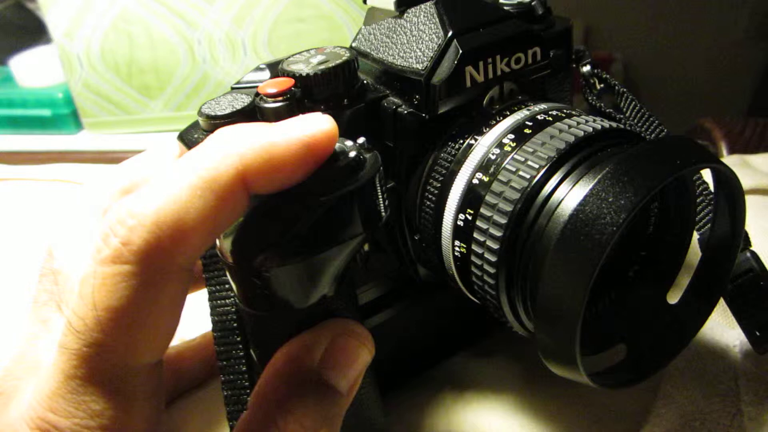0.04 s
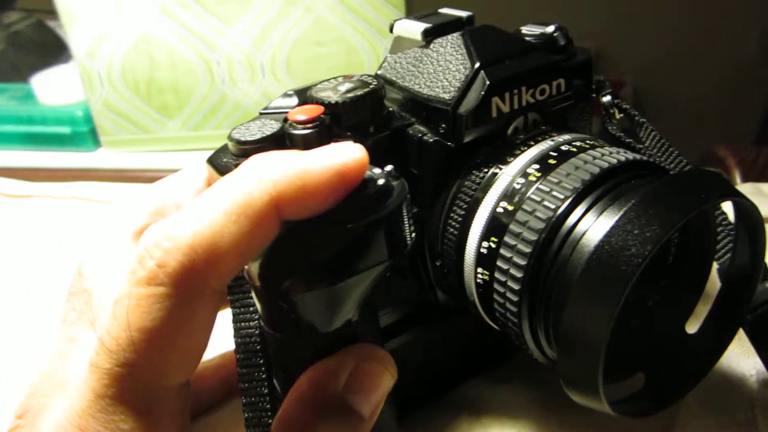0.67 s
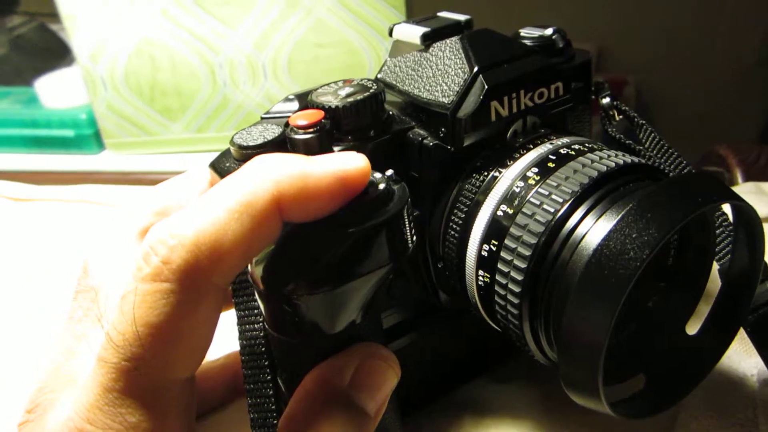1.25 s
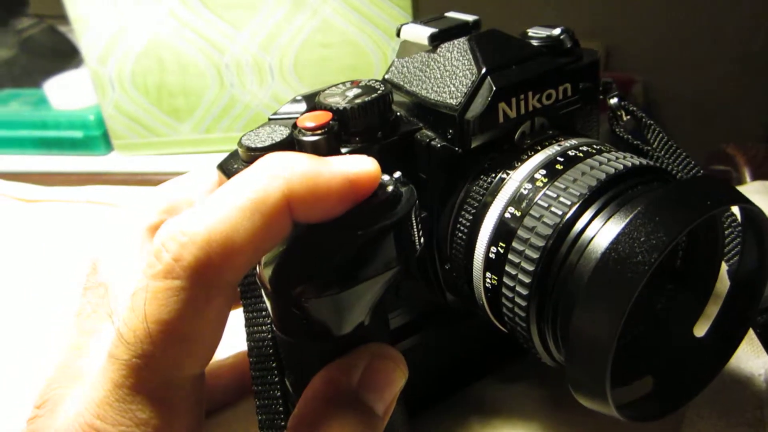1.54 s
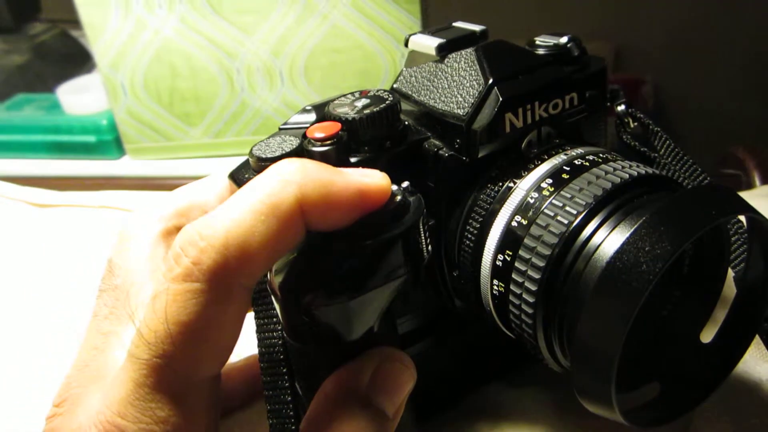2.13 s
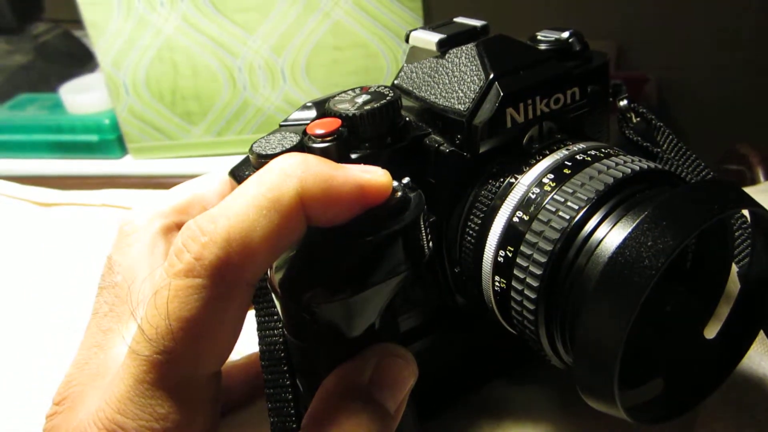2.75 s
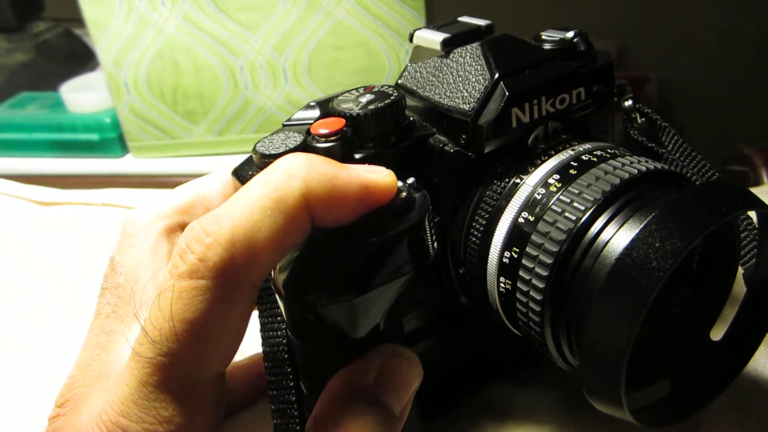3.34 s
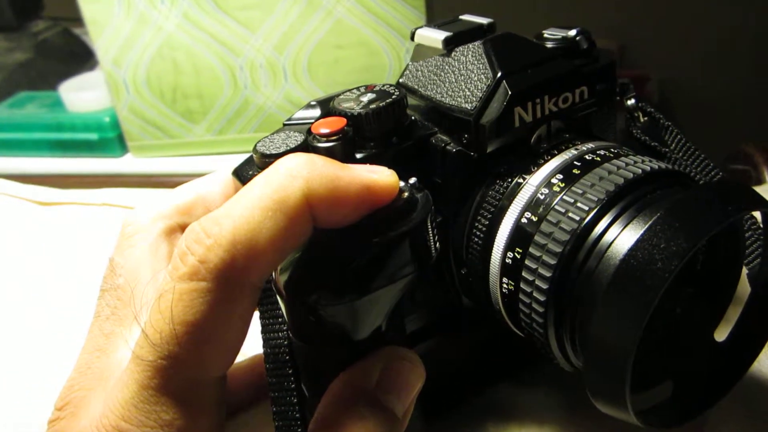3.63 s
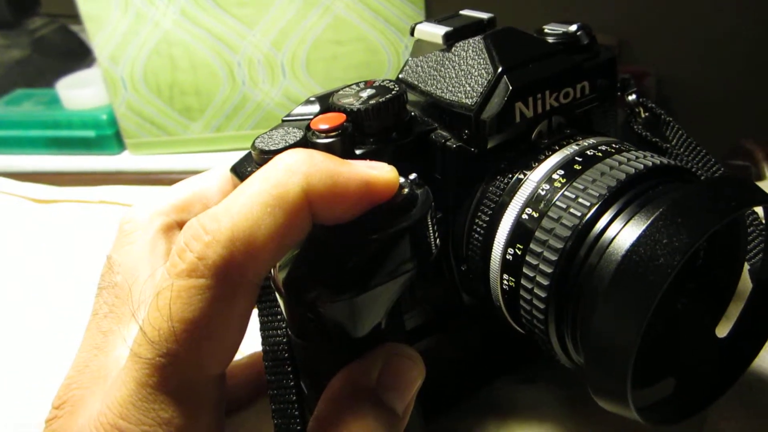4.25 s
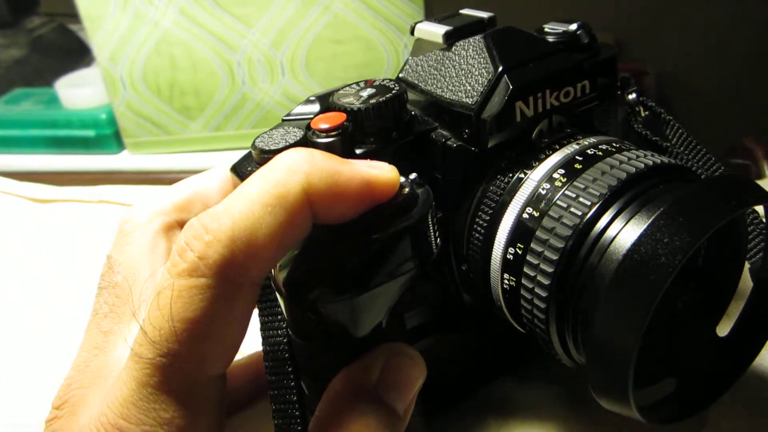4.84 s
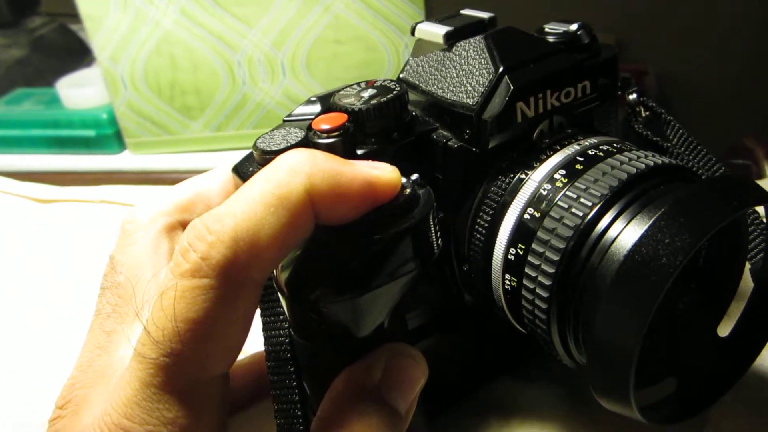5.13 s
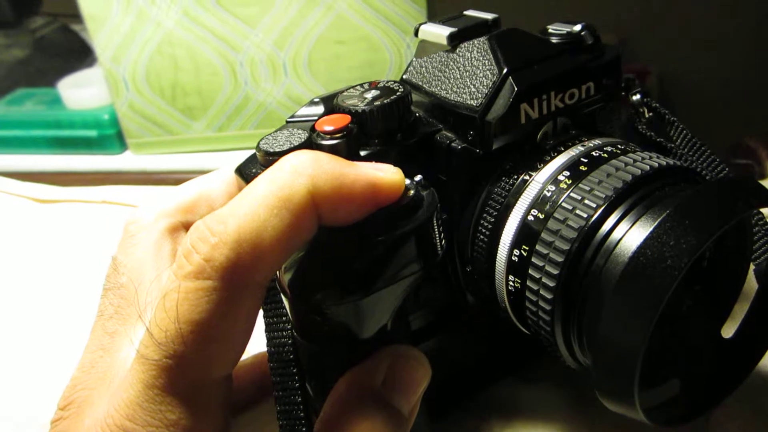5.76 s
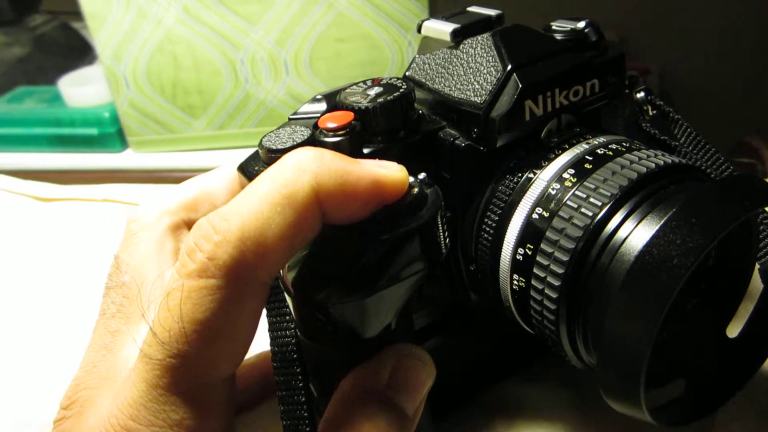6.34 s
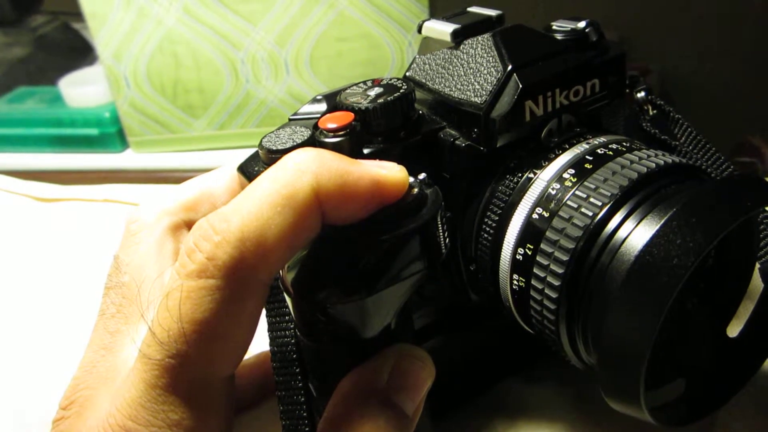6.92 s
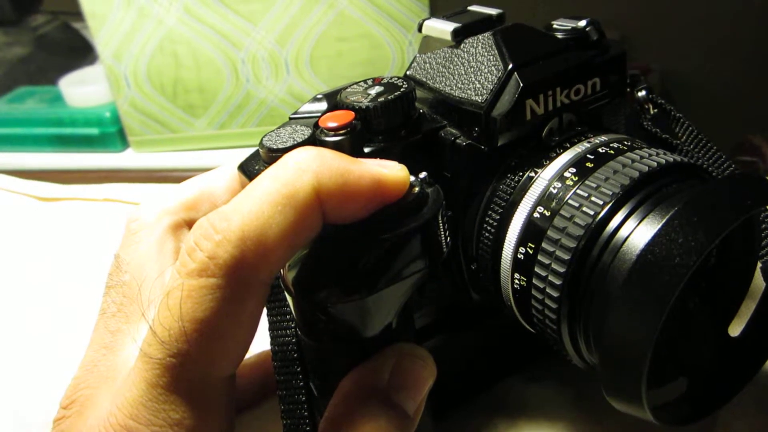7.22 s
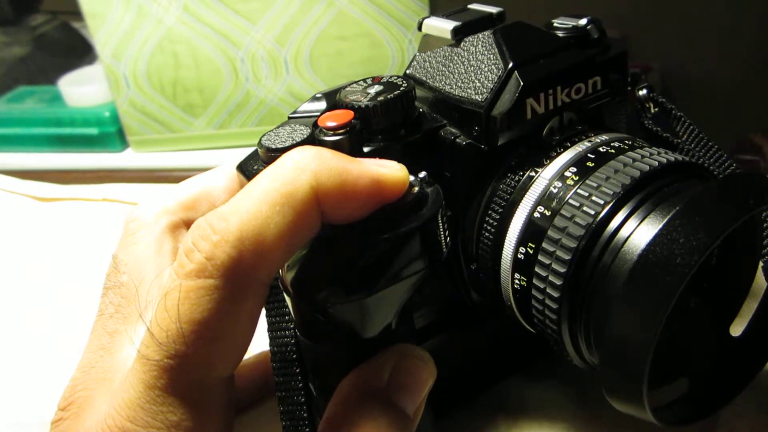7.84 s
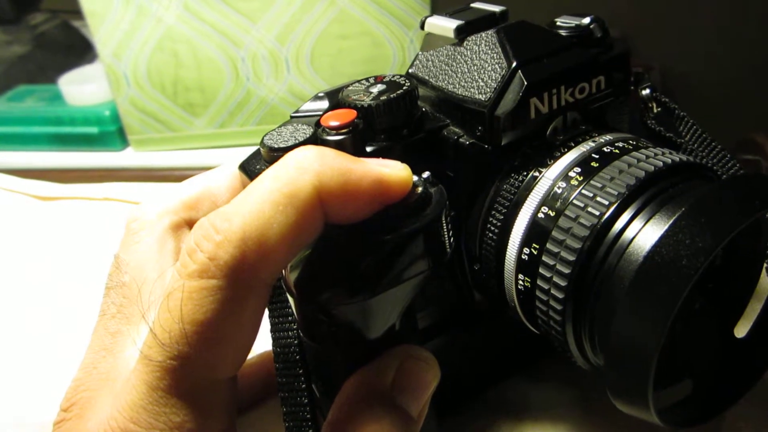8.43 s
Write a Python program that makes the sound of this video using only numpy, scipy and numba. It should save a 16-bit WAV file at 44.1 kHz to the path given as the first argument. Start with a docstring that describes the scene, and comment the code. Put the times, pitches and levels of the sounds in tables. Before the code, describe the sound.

A low, muffled engine rises in pitch outside a small, quiet room. Then a button clicks and a film camera with a motor drive fires a continuous burst of about two dozen shots, loud and very near the microphone. Crisp shutter snaps and hard, slightly ringing clacks alternate with brief whirs of winding gears in an even rhythm. The engine is barely audible beneath the camera, and there is little echo.

```python
"""A motor-driven film camera fires 23 frames in a burst, close by in a quiet room.
Between frames, gears wind against a ratchet and hit their stop; then the mirror flips up, the shutter
runs and the mirror drops. Each impact excites the resonances of its part, and the metal body rings.
An engine revs outside, heard through the wall and in the room's modes. Automatic gain control
ducks it as soon as the camera starts."""
import sys
import numpy as np
from scipy import signal
from scipy.fft import rfft, irfft
from scipy.io import wavfile
from scipy.ndimage import uniform_filter1d
from numba import njit

SR = 44100
rng = np.random.default_rng(int(sys.argv[2]) if len(sys.argv) > 2 else 0)


def file_out(sig):
    """Save sig as 16-bit WAV at sys.argv[1]."""
    # one column per channel
    cols = np.atleast_2d(sig).T
    # limit, then scale
    lim = np.clip(cols, -1, 1)
    pcm = np.round(lim * 32767).astype(np.int16)
    wavfile.write(sys.argv[1], SR, pcm)


N = 382788
T = np.arange(N) / SR


def undb(db):
    """Decibels to amplitude ratio."""
    return 10 ** (np.asarray(db) / 20)


def samples(ms):
    """Milliseconds to a whole number of samples."""
    return int(round(ms * SR / 1000))


def clock(start_ms, end_ms):
    """Time in ms of every sample between two moments."""
    return np.arange(samples(start_ms), samples(end_ms)) * 1000 / SR


def curve(points):
    """Linear interpolation of (seconds, value) points over the whole scene."""
    return np.interp(T, *np.transpose(points))


def shape(points, hz):
    """Magnitude response: gain of a (Hz, dB) spectrum, interpolated over log frequency."""
    corner_hz, db = np.transpose(points)
    return undb(np.interp(np.log(hz + 1), np.log(corner_hz), db))


def add(track, s, ms, sound):
    """Superposition: mix a sound into a track, ms after the moment s."""
    i = min(int(s * SR) + samples(ms), N)
    track[i:i + len(sound)] += sound[:N - i]


def through(x, response):
    """Convolution with an impulse response scaled to unit energy."""
    return signal.fftconvolve(x, response / np.linalg.norm(response))[:N]


def colour(x, points, size=2048):
    """Minimum-phase filter with the given relative spectrum, made by folding the cepstrum."""
    cepstrum = irfft(np.log(shape(points, np.fft.rfftfreq(size, 1 / SR))))
    cepstrum[1:size // 2] *= 2
    cepstrum[size // 2 + 1:] = 0
    return through(x, irfft(np.exp(rfft(cepstrum))))


def fade(t60):
    """Exponential decay down to -60 dB."""
    return np.exp(-np.log(1000) * T[:int(t60 * SR)] / t60)


def ring(x, modes):
    """Modal resonance: a sound drives a set of damped sinusoids."""
    response = np.zeros(SR // 2)
    for hz, db, t60 in modes:
        decay = fade(t60)[:len(response)]
        response[:len(decay)] += undb(db) * decay * np.cos(2 * np.pi * hz * T[:len(decay)])
    return through(x, response)


def gate(t, start_ms, attack_ms, end_ms, release_ms):
    """Envelope with a linear attack, a hold and an exponential release."""
    return np.clip((t - start_ms) / attack_ms, 0, 1) * np.exp(-np.maximum(t - end_ms, 0) / release_ms)


def walk(rate_hz):
    """Slow random modulation: smoothed steps with a spread of 1."""
    hold = int(SR / rate_hz)
    steps = np.repeat(rng.standard_normal(N // hold + 1), hold)
    smooth = uniform_filter1d(uniform_filter1d(steps, hold), hold)[:N]
    return smooth / smooth.std()


def unsteady(t, size=350):
    """Quick random modulation: a moving average of noise with a spread of 1."""
    drift = uniform_filter1d(rng.standard_normal(len(t)), size=size)
    return drift / drift.std()


def chatter(decay_ms, rise_ms=0.19, ragged_db=2.5):
    """Broadband excitation: a dying burst of tiny contacts of uneven strength."""
    t = clock(0, 30)
    envelope = np.sqrt(np.exp(-t / decay_ms) * (1 - np.exp(-t / rise_ms)))
    burst = envelope * undb(ragged_db * unsteady(t, size=20)) * rng.standard_normal(len(t))
    whitened = irfft(np.exp(1j * np.angle(rfft(burst))), len(t))
    return whitened * np.linalg.norm(envelope) * envelope


# Spectrum of the street and room noise. Each row: frequency in Hz, relative density in dB.
AMBIENT_SPECTRUM = [(130, -3.5), (290, -8), (1200, -15.5), (7700, -35.5), (15500, -44)]
# Course of that noise. Each row: time in seconds, level in dB.
AMBIENT_LEVEL = [(0, -54), (1.4, -48), (8.68, -60)]


def ambient_noise():
    """Street and room noise is broadband, with a density that falls toward the treble."""
    return undb(curve(AMBIENT_LEVEL)) * colour(rng.standard_normal(N), AMBIENT_SPECTRUM)


# Speed of the engine as it pulls through two gears. Each row: time in seconds, firing rate in Hz.
FIRING_RATE = [(0.08, 27.46), (1.12, 54.14), (2.19, 76.24), (2.88, 49.84), (3.12, 40.2), (3.81, 43.02),
               (7.33, 69.38), (8.33, 36.65)]
# Transmission through the wall. Each row: frequency in Hz, gain in dB.
WALL_TRANSMISSION = [(25, -21), (42, -2), (60, 1), (78, -5), (152, -24), (182, -10), (212, -32)]
# Course of the engine's hum. Each row: time in seconds, gain in dB.
HUM_GAIN = [(.15, -35.5), (.32, -43), (.47, -35), (.7, -42.5), (1.1, -37.5), (1.33, -28.5), (1.45, -37.5),
            (1.75, -42), (1.87, -31), (2.7, -41.5), (4.3, -42), (5.0, -46.5), (7.6, -45.5), (8.2, -66)]
# Emphasis of the hum's second harmonic. Each row: time in seconds, added gain in dB.
SECOND_HARMONIC_GAIN = [(2.6, -7), (3.2, 2.5), (6.45, 19.5), (6.8, -2)]
# Room modes driven by the exhaust. Each row: frequency in Hz, relative level in dB, T60 in seconds.
ROOM_RESONANCES = [(182, -4, 0.21), (366, -0.5, .22), (419, 1.5, .19)]


def engine(count=12, waver_db=2.0, jitter=0.00843, mid_hz=55,
           drone_db=-57, drone_db_per_octave=13, gas_db=1.5):
    """Forced resonance: firing harmonics hum through the wall and excite each room mode they pass."""
    hz = curve(FIRING_RATE)
    phase = 2 * np.pi * np.cumsum(hz * (1 + jitter * walk(14))) / SR
    harmonics = {k: undb(waver_db * walk(25.1)) * np.sin(k * phase + rng.uniform(0, 2 * np.pi))
                 for k in range(1, count + 1)}
    second_db = curve(SECOND_HARMONIC_GAIN)
    hum = sum(shape(WALL_TRANSMISSION, k * hz) * undb((k == 2) * second_db) * harmonics[k]
              for k in range(1, 6))
    firings = 2 * np.sqrt(hz / SR) * sum(harmonics.values())  # as strong per Hz as unit white noise
    puffs = (1 + np.cos(phase)) * rng.standard_normal(N)  # one puff of gas per firing
    drone = ring(firings + undb(gas_db) * puffs, ROOM_RESONANCES)
    drone_gain = undb(drone_db + drone_db_per_octave * np.log2(hz / mid_hz))
    return undb(curve(HUM_GAIN)) * hum + drone_gain * drone


# Response of each camera part, listed by name. Each row: frequency in Hz, relative level in dB.
PART_SPECTRA = {"stop": [(150, -28), (800, -24.5), (1300, -18), (1750, -25.5), (2020, -7.5), (2180, -2),
                (2370, -13.5), (2550, -5), (3200, 2), (4950, -0.5), (5400, -11), (6100, -13.5),
                (6750, -10.5), (7300, -19.5), (9700, -16.5), (15500, -31)], "mirror up": [(200, -31),
                (900, -16), (1700, -16.5), (2000, -6), (2700, -6), (3200, 0), (4100, -10.5), (5500, -0.5),
                (7000, -8), (8300, -0.5), (9150, -13.5), (9700, -3.5), (14700, -8.5), (15600, -26.5)],
                "first curtain": [(250, -26), (450, -10.5), (900, -20.5), (1250, -8.5), (1900, -25),
                (2950, -1), (4800, -11), (5600, -5.5), (8800, -5), (15500, -15)],
                "second curtain": [(250, -32), (550, -11.5), (1100, -8.5), (2000, -9.5), (2400, 5.5),
                (3000, 0.5), (4200, -3), (6500, -1.5), (10000, -4.5), (15500, -14.5)],
                "mirror down": [(250, -46), (700, -24), (1000, -12), (1300, -23), (2400, -9.5),
                (3400, -0.5), (4400, -5.5), (6500, 0.5), (12000, -7), (15500, -15.5)],
                "levers": [(250, -16.5), (2200, -3), (6000, -2.5), (9500, -3.5), (12000, -10),
                (15500, -16)], "gears": [(300, -24.5), (900, -8), (1500, -2), (1900, -8.5), (3300, 1),
                (5200, -2), (6700, -2.5), (7200, -4.5), (10700, -4), (12600, -13), (15500, -21)],
                "latch": [(600, -28), (1450, 4), (7000, 12.5), (13500, 2), (15500, -12)]}


def finger(settle_s=.104, settle_db=-44, press_s=2.1165, press_db=-16):
    """Light impacts: a finger settles on the grip, then clicks the release."""
    settle, press = np.zeros((2, N))
    add(settle, settle_s, 0, undb(settle_db) * chatter(decay_ms=2.9))
    add(press, press_s, 0, undb(press_db) * chatter(decay_ms=1.0))
    button_spectrum = [(800, -27), (2500, -7), (7000, -3), (15000, 2)]
    return colour(settle, PART_SPECTRA["stop"]) + colour(press, button_spectrum)


# Winding strokes, about 3.4 a second. Each row: time in seconds at the stroke's end,
# relative strength in dB, delay of the rebound in ms.
STROKES = [(2.4156, -1, 0.85), (2.7072, -1.5, .93), (3.0002, -2.5, 0.883), (3.2945, -2.5, .8),
           (3.5866, -2, 0.9), (3.8806, -2.5, 0.85), (4.1729, -3, 0.85), (4.4663, -3, .97),
           (4.7573, -4, .88), (5.0511, -3.5, 0.84), (5.3444, -4, 0.93), (5.6384, -3.5, 0.95),
           (5.93, -4, 0.9), (6.2224, -3.5, 0.88), (6.5172, -3, .95), (6.8139, -4, 0.86),
           (7.1072, -3.5, 0.94), (7.399, -3, 0.97), (7.694, -4, 0.95), (7.9918, -7, 0.93),
           (8.2871, -6.5, .88), (8.5818, -6.5, 0.88)]
FIRST_FRAME_S = 2.1216  # already wound: it fires without a stroke
STROKE_MS = 126
CLACK_MS = 1.1  # the clack sounds this many ms after each listed stroke time


def levers(drag_db=-10.5, swing_db=-30, first_swing_db=-26,
           squeak_hz=1200, glide_hz_per_ms=45, squeak_ms=8, squeak_width_ms=3, squeak_db=-25):
    """Friction: levers drag before the stop, the mirror linkage swings after it and squeaks from rest."""
    rub, squeak = np.zeros((2, N))
    t = clock(-20, 50)
    onset_ms = CLACK_MS + t[0]
    drag = gate(t, start_ms=-13.5, attack_ms=5.6, end_ms=-0.32, release_ms=4.2)
    swing = gate(t, start_ms=1.4, attack_ms=7.5, end_ms=39, release_ms=3.8)
    for s, db, _ in STROKES:
        envelope = undb(drag_db + db) * drag + undb(swing_db) * swing
        add(rub, s, onset_ms, envelope * rng.standard_normal(len(t)))
    add(rub, FIRST_FRAME_S, onset_ms, undb(first_swing_db) * swing * rng.standard_normal(len(t)))
    hz = squeak_hz + glide_hz_per_ms * (t - squeak_ms + squeak_width_ms)
    chirp = np.sin(2 * np.pi * np.cumsum(hz) / SR) * np.exp(-((t - squeak_ms) / squeak_width_ms) ** 2)
    add(squeak, FIRST_FRAME_S, onset_ms, undb(squeak_db) * chirp)
    return colour(rub, PART_SPECTRA["levers"]) + squeak


def gear_whine(mesh_hz=3188, mesh_db=-26, upper_hz=4860, upper_db=-33, peak_ms=-60, width_ms=37,
               dip=0.0076, cam_ms=46, wobble=0.0078, scatter_db=1.5, flutter_db=2.2):
    """Frequency modulation: two gear-mesh tones waver in mid-stroke and dip under the cam's load."""
    out, t = np.zeros(N), clock(-STROKE_MS, 0)
    swell = np.exp(-((t - peak_ms) / width_ms) ** 4)
    cam_load = np.cos(2 * np.pi * (t - peak_ms) / cam_ms)
    for s, db, _ in STROKES:
        drag = rng.standard_normal()  # no two strokes bear alike on the gears
        speed = 1 - dip * (1 + .5 * drag) * cam_load + wobble * unsteady(t)
        phase_per_hz = 2 * np.pi * np.cumsum(speed) / SR
        lower = undb(mesh_db) * swell * np.sin(mesh_hz * phase_per_hz)
        upper = undb(upper_db) * np.sqrt(swell) * np.sin(upper_hz * phase_per_hz)
        gain = undb(db + scatter_db * drag + flutter_db * unsteady(t))
        add(out, s, CLACK_MS + t[0], gain * (lower + upper))
    return out


# Response of the pawl on the ratchet. Each row: frequency in Hz, relative level in dB.
PAWL_SPECTRUM = [(500, -29), (3000, -9.5), (6750, -2.5), (7300, -33), (8000, -0.5), (8800, -6), (9700, 4.5),
                 (10800, 4), (11200, 0), (11650, 6), (12600, -5), (13100, -1), (15200, -8.5)]
# Modes of the metal body. Each row: frequency in Hz, relative level in dB, T60 in seconds.
BODY_MODES = [(1460, -3.5, 0.039), (3960, -0.5, 0.035), (4820, 4, 0.038), (4890, 0, 0.04),
              (6680, 1.5, 0.03), (7800, -2.5, 0.031), (9630, 5.5, 0.017), (10520, 8, 0.022),
              (12900, 1.5, .02)]


def winder(teeth_per_s=242, spin_up_ms=11, wobble=0.0049, tooth_db=-13.0, tooth_decay=0.19,
           tighten_db_per_ms=0.0374, gear_db=-22.0, ring_db=-22, idle_db=-8, idle_ms=26,
           end_phase=0.06, effort=0.95):
    """Periodic impacts: a pawl ticks over the ratchet while the gears hiss, and both ring the body."""
    gears, pawl = np.zeros((2, N))
    t = clock(-STROKE_MS - idle_ms, 10)
    running_ms = np.maximum(t + STROKE_MS, 0)
    tooth_rate = teeth_per_s * (1 - .5 * np.exp(-running_ms / spin_up_ms))
    slack = undb(idle_db) * (t < 0)
    load = np.maximum(gate(t, -STROKE_MS, attack_ms=6, end_ms=0, release_ms=1.2), slack)
    tightening = undb(tighten_db_per_ms * (t + STROKE_MS / 2))
    for s, db, _ in STROKES:
        hiss, tick = rng.standard_normal((2, len(t)))
        teeth = np.cumsum(tooth_rate * (1 + wobble * unsteady(t))) / SR
        teeth += end_phase - np.interp(0, t, teeth)  # every stroke ends at the same point of a tooth
        drive = undb(effort * db) * load
        add(gears, s, CLACK_MS + t[0], drive * hiss)
        add(pawl, s, CLACK_MS + t[0], drive * tightening * tick * np.exp(-(teeth % 1) / tooth_decay))
    whirr = undb(gear_db) * colour(gears, PART_SPECTRA["gears"])
    whirr += undb(tooth_db) * colour(pawl, PAWL_SPECTRUM)
    return whirr + undb(ring_db) * ring(whirr, BODY_MODES)


# Impacts that open and close a stroke. Each row: time from the wind stop in ms,
# relative level in dB, decay in ms, part.
WINDING_BLOWS = [(-150.8, -10.5, 2.9, "latch"), (-125, -17.5, 2.7, "levers"), (-119, -18.5, 2.2, "latch"),
                 (-16.5, -14, 1.4, "levers"), (-10.5, -8.5, 2, "levers"), (1, -3, 1.64, "levers")]
# Impacts of the rising mirror and the two curtains, with the same columns.
EXPOSURE_BLOWS = [(40.2, -1.5, 1.7, "mirror up"), (41.37, 6.5, 1.19, "mirror up"),
                  (47.5, -16, 1.7, "mirror up"), (53.2, -28, 2, "mirror up"), (56, -15, 2.8, "mirror up"),
                  (66.5, -20.5, 3, "first curtain"), (68.9, -4.5, 1.94, "first curtain"),
                  (77.7, -7.5, 3.5, "second curtain"), (83.2, -5, 2.2, "second curtain"),
                  (86.4, -20.5, 5.3, "second curtain")]
# Lag of the curtains when they start from rest. Each entry: part, delay in ms.
CURTAIN_LAG = {"first curtain": 11, "second curtain": 4}
# Impacts of the falling mirror. Each row: time from landing in ms, relative level in dB,
# decay in ms, part.
RETURN_BLOWS = [(-4.5, -17, 10.1, "mirror down"), (1, -0.5, 2.12, "mirror down"),
                (5, -10, 3.5, "mirror down"), (8.5, -9.5, 2, "mirror down"),
                (14, -10.5, 1.55, "mirror down"), (17.5, -16, 3.2, "mirror down")]
# Falls of the mirror. Each row: landing in seconds, strength in dB before scaling by `follow`.
MIRROR_LANDINGS = [(2.2366, -15), (2.5302, -14), (2.823, -15.5), (3.1168, -16.5), (3.4097, -14),
                   (3.7033, -15.5), (3.9954, -18), (4.2886, -16.5), (4.58, -18.5), (4.8734, -17.5),
                   (5.1667, -19), (5.461, -21), (5.7525, -20.5), (6.0443, -17), (6.3395, -17.5),
                   (6.6358, -20.5), (6.9297, -19), (7.221, -20.5), (7.5154, -18.5), (7.814, -23.5),
                   (8.109, -25), (8.4035, -22)]


def shutter(scatter_db=1.3, scatter_ms=.15, blow_db=1, exposure_db=0.51, landing_db=7.5,
            follow=0.43, ring_db=-18, latch_ring_db=-1):
    """Impact excitation: latch, levers, mirror and curtains chatter and drive the body's modes."""
    force = {part: np.zeros(N) for *_, part in WINDING_BLOWS + EXPOSURE_BLOWS + RETURN_BLOWS}
    from_rest = [(ms + CURTAIN_LAG.get(part, 0), db, decay_ms, part)
                 for ms, db, decay_ms, part in EXPOSURE_BLOWS]
    full_cycle = WINDING_BLOWS + EXPOSURE_BLOWS
    actions = [(FIRST_FRAME_S, CLACK_MS, 0, from_rest)]
    actions += [(s, CLACK_MS, exposure_db + follow * db, full_cycle) for s, db, _ in STROKES]
    actions += [(s, 0, landing_db + follow * db, RETURN_BLOWS) for s, db in MIRROR_LANDINGS]
    for s, lag_ms, strength_db, blows in actions:
        for ms, db, decay_ms, part in blows:
            later, harder = rng.standard_normal(2)
            gain = undb(blow_db + strength_db + db + scatter_db * harder)
            add(force[part], s, lag_ms + ms + scatter_ms * later, gain * chatter(decay_ms))
    knocks = sum(colour(push, PART_SPECTRA[part]) for part, push in force.items())
    # the latch sits on the frame and rings it most
    return knocks + ring(undb(ring_db) * knocks + undb(latch_ring_db) * force["latch"], BODY_MODES)


def wind_stop(hit_db=28.5, rebound=0.6, rattle_db=-30, rattle_ms=3.5):
    """Comb filtering: the winder hits its stop and rattles, and one delayed rebound colours the clack."""
    force, t = np.zeros(N), clock(0, 20)
    for s, db, rebound_ms in STROKES:
        push = undb(rattle_db) * np.exp(-t / rattle_ms) * rng.standard_normal(len(t))
        push[0] -= 1
        push[samples(rebound_ms)] -= rebound
        add(force, s, CLACK_MS, undb(hit_db + db) * push)
    return colour(force, PART_SPECTRA["stop"])


def room(x, desk_db=-17, desk_t60=0.026, tail_db=-21, tail_t60=0.49,
         low_db=-21, low_t60=0.21, low_hz=1400):
    """Reverberation: quick desk reflections, a small furnished room's faint tail and a dull low decay."""
    low = signal.sosfilt(signal.butter(3, low_hz, fs=SR, output="sos"), rng.standard_normal(N))
    desk, tail = rng.standard_normal((2, N))
    layers = (desk_db, desk_t60, desk), (tail_db, tail_t60, tail), (low_db, low_t60, low)
    out = x
    for db, t60, scatter in layers:
        decay = fade(t60)
        response = np.r_[np.zeros(samples(2)), decay * scatter[:len(decay)]]
        out = out + undb(db) * through(x, response)
    return out


def scene():
    """Superposition of the camera in its room, the engine and the ambient noise, in mono."""
    camera = wind_stop() + shutter() + winder() + gear_whine() + levers() + finger()
    return (room(camera) + engine() + ambient_noise())[None]


@njit
def gain_control(x, limit, fall_db_per_ms, rise_db_per_s, range_db):
    """Negative feedback: the gain drops quickly while the output is over the limit, then creeps back."""
    y, cut_db = np.empty(len(x)), 0.
    for i in range(len(x)):
        y[i] = x[i] * 10 ** (-cut_db / 20)
        if abs(y[i]) > limit:
            cut_db = min(range_db, cut_db + fall_db_per_ms * 1000 / SR)
        else:
            cut_db = max(0., cut_db - rise_db_per_s / SR)
    return y


def record(dry, opens_s=0.068, fade_in_s=0.0063, ceiling=.66, top_hz=16000):
    """Dynamic range compression: after a fade-in, gain control, peak clipping and a steep low-pass."""
    heard = dry[0] * np.clip((T - opens_s) / fade_in_s, 0, 1)
    ducked = gain_control(heard, limit=0.29, fall_db_per_ms=12.0, rise_db_per_s=3.5, range_db=20.0)
    clipped = np.clip(ducked, -ceiling, ceiling)
    return signal.sosfilt(signal.ellip(10, .2, 70, top_hz, fs=SR, output="sos"), clipped)[None]


dry = scene()
out = record(dry)
file_out(out)
```